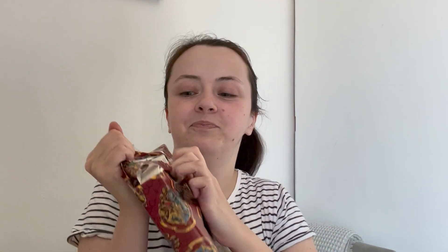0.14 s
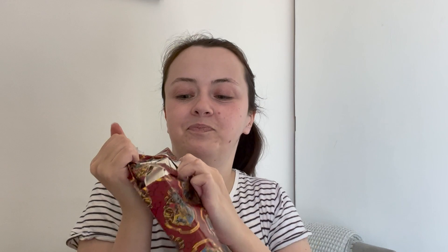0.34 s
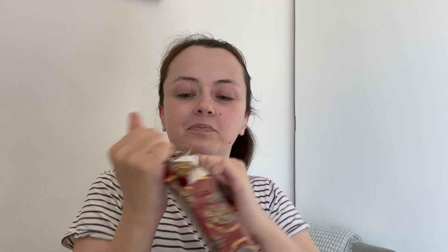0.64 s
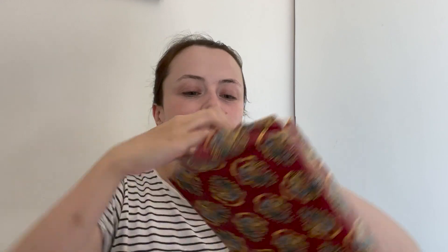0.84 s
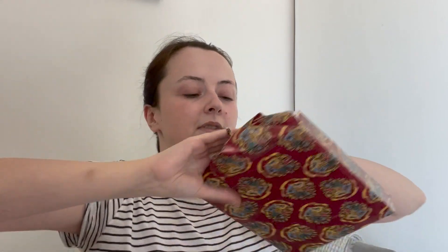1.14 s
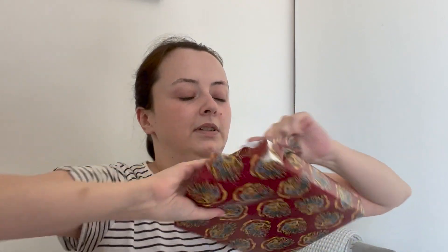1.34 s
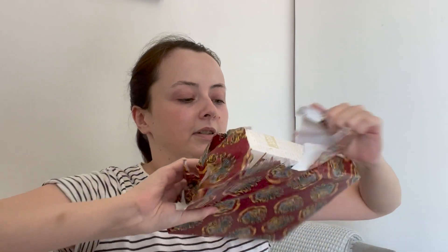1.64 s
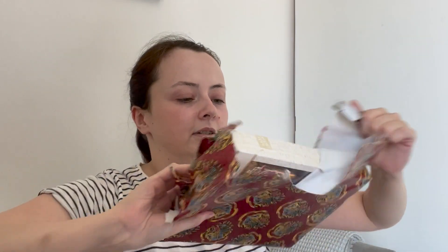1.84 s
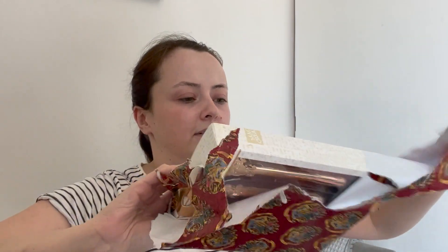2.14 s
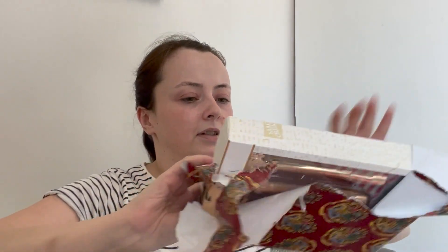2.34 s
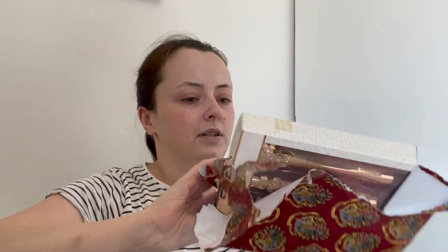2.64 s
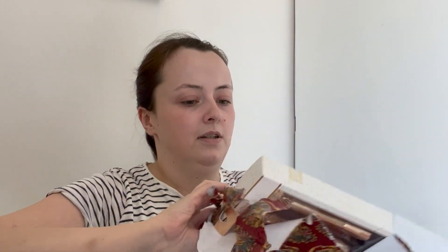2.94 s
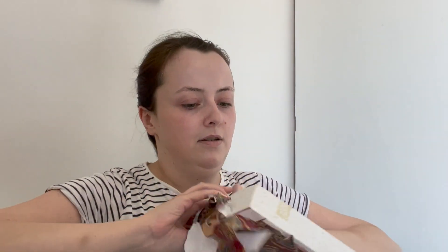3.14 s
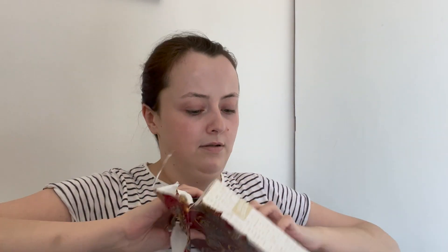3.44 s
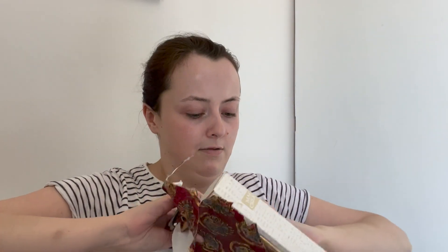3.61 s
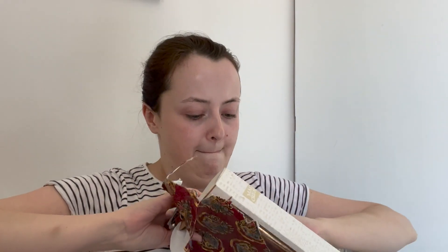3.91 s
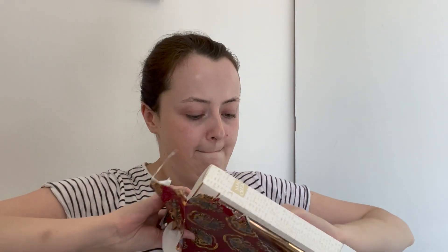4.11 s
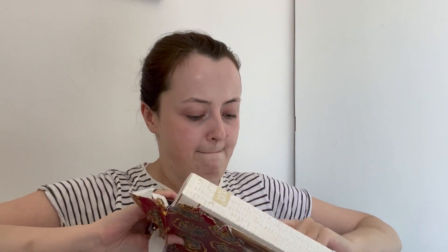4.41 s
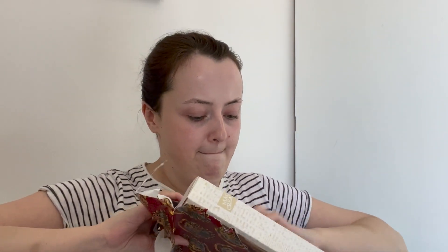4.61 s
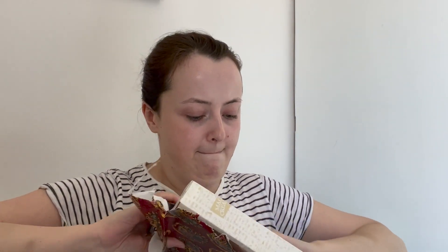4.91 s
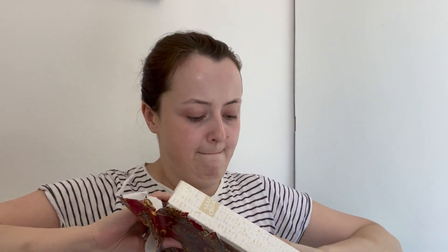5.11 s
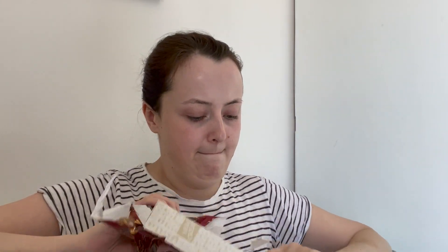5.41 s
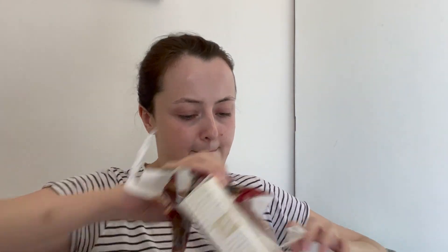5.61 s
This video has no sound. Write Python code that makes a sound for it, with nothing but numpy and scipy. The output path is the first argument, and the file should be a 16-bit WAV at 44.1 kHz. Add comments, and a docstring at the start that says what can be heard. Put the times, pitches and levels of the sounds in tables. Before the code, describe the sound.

Close stereo sound of a gift being unwrapped in a small, fairly bare room. Fingers crinkle stiff paper with sharp snaps and light knocks, then three short bright rips tear it open. After a quieter pause, a hollow cardboard box rubs and bumps within the loose paper, with soft rustling and brief edge scrapes. Faint low rumble lies beneath.

```python
"""Wrapping paper crackles under the fingers, is ripped off a cardboard box in three pulls, and the box slides out.
Buckling creases and parting fibres are random clicks that ring in bands of noise and drive the sheet and box.
Single creases snap as noise bursts, knocks excite a falling thud and the modes of the hollow box, and
edges rasp through a narrow, gliding resonance. All sounds in a small, fairly bare room with faint rumble,
heard in stereo at arm's length."""
import sys
import numpy as np
from scipy import signal
from scipy.fft import rfft, irfft, next_fast_len
from scipy.io import wavfile

SR = 44100
rng = np.random.default_rng(int(sys.argv[2]) if len(sys.argv) > 2 else 0)


def output_pcm(signal):
    """Save a mono or channel-first signal as 16-bit PCM at the path in sys.argv[1].

    Samples are clipped to [-1, 1] before scaling.
    """
    pcm = np.clip(np.atleast_2d(signal).T, -1, 1) * 32767
    wavfile.write(sys.argv[1], SR, np.round(pcm).astype(np.int16))


N = 253731
T = np.arange(N) / SR
FACET_RING_S = 0.0006  # energy decay of a small facet of paper

# Radiation of small stiff facets of paper. Each row: frequency in Hz, gain in dB.
CRACKLE_SPECTRUM = [(500, -7), (1400, -22.5), (1800, -6.5), (2400, -4.5), (4500, 0.5), (7000, 2), (9500, 2),
                    (11300, -3.5), (13700, 8), (15700, -14)]


def undb(db):
    """Decibels to amplitude ratio: 20 dB is a factor of ten."""
    return 10 ** (np.asarray(db) / 20)


def unit(x):
    """Normalization of power: scale to rms 1."""
    return x / np.sqrt(np.mean(x ** 2))


def ring(x, response):
    """Linear superposition: convolve a sound with an impulse response."""
    return signal.fftconvolve(x, response)[:N]


def colour(x, points, size=4096):
    """Minimum-phase filtering: folding the cepstrum makes a causal response with the given spectrum."""
    hz, db = np.transpose(points)
    bins_hz = np.fft.rfftfreq(size, 1 / SR)
    gain = undb(np.interp(np.log(bins_hz + 1), np.log(hz), db))
    cepstrum = irfft(np.log(gain))
    cepstrum[1:size // 2] *= 2
    cepstrum[size // 2 + 1:] = 0
    return ring(x, irfft(np.exp(rfft(cepstrum))))


def add(track, s, sound):
    """Superposition: mix a short sound into the track at time s."""
    start = max(int(s * SR), 0)
    track[start:start + len(sound)] += sound[:N - start]


def burst(decay_s, size=2048):
    """High modal density: one patch of paper rings as exponentially decaying noise."""
    return rng.standard_normal(size) * np.exp(-T[:size] / max(decay_s, 1 / SR))


def walk(per_s):
    """Slow random modulation: straight lines between random knots, with a spread near 1."""
    knots = rng.standard_normal(N // 100)
    return 1.2 * np.interp(T * per_s, np.arange(len(knots)), knots)


def grains(clicks, friction_db, decay_s, bend_db=0.5):
    """Impulsive excitation: clicks ring briefly, each with its own tint, as bending shifts the radiating bands."""
    # Edges of neighbouring bands in Hz.
    band_edges_hz = [60, 300, 700, 1300, 2200, 3600, 5600, 8500, 12000, 17000]
    out, at = np.zeros(N), np.flatnonzero(clicks)
    for band in zip(band_edges_hz, band_edges_hz[1:]):
        tint_db = rng.standard_normal(N)[at].clip(-2, 2)
        energy = np.zeros(N)
        energy[at] = (clicks[at] * undb(tint_db)) ** 2
        energy = signal.lfilter([1], [1, -np.exp(-1 / (decay_s * SR))], energy)
        # friction adds a steady hiss under the clicks
        envelope = np.sqrt(energy / energy.mean() + undb(friction_db) ** 2)
        band_filter = signal.butter(2, band, "bandpass", fs=SR, output="sos")
        noise = signal.sosfilt(band_filter, rng.standard_normal(N))
        out += noise * envelope * undb(bend_db * walk(per_s=45))
    return out


def stroke(start, rise_s, hold_s, release_s, db, sheet_db, box_db, sag_db_per_s=0):
    """Force envelope: a movement gathers, holds and dies away; gives gains of crackle, sheet and box."""
    age = T - start
    held = np.clip(age - rise_s, 0, max(hold_s, 0))
    released = np.maximum(age - rise_s - hold_s, 0)
    effort = np.clip(age / rise_s, 0, 1) * undb(-sag_db_per_s * held) * np.exp(-released / release_s)
    return np.outer(undb([db, db + sheet_db, db + box_db]), effort)


def paper(strokes, per_s, scatter_db, bunch_db, friction_db, tilt_db, flex_hiss_db=-9, bend_db=1.24):
    """Crackling noise: bunches of unequal fractures, over the hiss of sliding surfaces, drive paper and box."""
    # Radiation of the wide flexing sheet. Each row: frequency in Hz, gain in dB.
    sheet_spectrum = [(150, -21), (380, 0.5), (570, 3.5), (690, -6.5), (900, 0.5), (1150, 0.5), (1550, -3),
                      (1800, -6), (2300, -1.5), (4500, -40.5)]
    # Radiation of the rubbed box. Each row: frequency in Hz, gain in dB.
    rub_spectrum = [(40, -14), (70, -11), (135, -2.5), (250, 1), (350, -9.5), (408, 5), (470, -2),
                    (750, -23.5), (2000, -43.5)]
    # strokes that overlap add in power
    crackle_gain, sheet_gain, box_gain = np.sqrt(sum(gains ** 2 for gains in strokes))
    sizes = undb(scatter_db * np.minimum(rng.exponential(size=N), 3.5))
    chance = per_s / SR * undb(bunch_db * walk(per_s=60))
    clicks = (rng.random(N) < chance) * sizes
    # tilt is in dB per octave: a taut sheet sounds brighter than a slack one
    spectrum = [(hz, db + tilt_db * np.log2(hz)) for hz, db in CRACKLE_SPECTRUM]
    # small facets give the crisp top, the wider sheet rings longer
    crackle = unit(colour(grains(clicks, friction_db, FACET_RING_S, bend_db), spectrum))
    sheet = unit(colour(grains(clicks, flex_hiss_db, 0.0014, bend_db), sheet_spectrum))
    box = unit(colour(grains(clicks, friction_db, decay_s=0.00034), rub_spectrum))
    return crackle_gain * crackle + sheet_gain * sheet + box_gain * box


def air():
    """Coherent low-frequency noise: faint rumble of the building, much alike at left and right."""
    # Rumble. Each row: frequency in Hz, relative level in dB.
    rumble_spectrum = [(30, -29), (40, -10), (51, 3.5), (75, -20), (420, -16), (700, -27), (2000, -33.5),
                       (8000, -34), (16000, -46)]
    mid, side = (unit(colour(rng.standard_normal(N), rumble_spectrum, size=16384)) for _ in range(2))
    return undb(-57.5) * (mid + undb(-12) * np.array([side, -side]))


def standing_waves(x):
    """Modal resonance: a few low modes of the room hum on after the sound that excites them."""
    # Each row: frequency in Hz, level at resonance in dB over the direct sound, 60 dB decay time in seconds.
    low_modes = [(49.4, -7, 1), (253, -18, 0.2), (410, -4, 0.61)]
    hum = np.zeros(N)
    for hz, db, t60 in low_modes:
        q = np.pi * hz * t60 / np.log(1000)
        hum += undb(db) * signal.lfilter(*signal.iirpeak(hz, q, fs=SR), x)
    return hum


def room(x, early_db, size=24000, count=600):
    """Reflection and reverberation: direct sound, quick echoes off body and near wall, then tail and hum."""
    late_db, t60_s = -6.5, 0.33
    first_echo_s, early_decay_s, tail_delay_s = 0.0009, 0.0042, 0.006
    t = T[:size]
    # dividing by sqrt(size) makes the levels those of the whole response over the direct sound
    early = undb(early_db) * unit((t > first_echo_s) * np.exp(-t / early_decay_s)) / np.sqrt(size)
    late = undb(late_db) * unit((t > tail_delay_s) * undb(-60 * t / t60_s)) / np.sqrt(size)
    early = early[:size // 10]
    out = np.array([x + ring(x, late * rng.standard_normal(size)) for _ in range(2)])
    # the sound comes from ever new spots on the parcel, so the short paths keep changing
    for moment in np.array_split(np.arange(N), count):
        for channel in out:
            echoes = np.convolve(x[moment], early * rng.standard_normal(len(early)))
            add(channel, T[moment[0]], echoes)
    return out + standing_waves(x)


def scraping(rise_s=0.0019, release_s=0.012):
    """Stick-slip: a catching edge rasps at one pitch, which glides as its free length changes."""
    # Edges of paper and card scraping. Each row: start in seconds, hold in seconds, level in dB,
    # pitch of the edge at the start in Hz, pitch at the end in Hz.
    scrapes = [(3.017, 0.029, -45.5, 2900, 3800), (3.262, 0.081, -53.5, 1470, 1170),
               (3.571, 0.033, -47, 450, 420), (4.972, 0.018, -40, 2300, 2290),
               (5.15, 0.07, -52, 2280, 2420), (5.226, 0.089, -51.5, 487, 520)]
    out = np.zeros(N)
    slip_times = 1. * (rng.random(N) < 400 / SR)  # 400 slips per second on average
    slips = grains(slip_times, friction_db=0, decay_s=FACET_RING_S)
    for s, hold_s, db, start_hz, end_hz in scrapes:
        pitch = np.interp(T, [s, s + rise_s + hold_s], [start_hz, end_hz])
        turn = np.exp(2j * np.pi * np.cumsum(pitch) / SR)
        # a resonance that follows the pitch; its half width is a share of the starting pitch
        narrow = signal.butter(2, 0.06 * start_hz, fs=SR, output="sos")
        edge = unit((signal.sosfilt(narrow, slips / turn) * turn).real)
        out += edge * stroke(s, rise_s, hold_s, release_s, db, 0, 0)[0]
    return out


def sliding(release_s=0.057):
    """Sliding friction: card is pushed along inside its wrapping, with more hiss than ticks."""
    # Pushes of the box. Each row: start in seconds, rise in seconds, hold in seconds, rustle level in dB,
    # flexing sheet in dB over the rustle, rubbed box in dB over the rustle.
    slides = [(2.914, 0.0082, 0.011, -40, -4, -8), (3.01, 0.027, 0.014, -40.5, -2.5, -25),
              (3.083, 0.0053, 0.038, -38.5, -2.5, -14), (3.115, 0.064, 0.074, -39.5, -5, -8),
              (3.478, 0.047, 0.015, -41.5, -4.5, -4), (3.626, 0.031, 0.029, -43.5, -2.5, 3.5),
              (3.689, 0.016, 0.064, -43.5, -1.5, -8), (3.818, 0.0082, 0.015, -43, 1, 2.5),
              (3.9, 0.017, 0.2, -46, -3, -2), (4.11, 0.17, 0.028, -45.5, -9, -6.5),
              (4.582, 0.0084, 0.11, -55, -4.5, 1), (4.668, 0.062, 0.008, -37, -10, -6.5),
              (4.809, 0.028, 0.057, -39.5, -6, -10), (4.963, 0.0034, 0.025, -32.5, -3, -11.5),
              (5.03, 0.014, .23, -42.5, -7, -16), (5.27, 0.049, 0.052, -38.5, -6, -14.5),
              (5.516, 0.0024, 0.26, -51.5, -1.5, -6.5)]
    pushes = (stroke(s, rise_s, hold_s, release_s, db, sheet_db, box_db)
              for s, rise_s, hold_s, db, sheet_db, box_db in slides)
    return paper(pushes, per_s=660, scatter_db=5.5, bunch_db=6.0, friction_db=-0.5, tilt_db=-1.5,
                 flex_hiss_db=-2)


def knocks(scuff_db=-29, slap_db=-8, size=8192):
    """Dispersion and modal ringing: bending waves in card carry treble first, so each thud falls in pitch."""
    # Fingers and paper knocking the box. Each row: start in seconds, level of the thud in dB,
    # pitch at contact in Hz, pitch of the struck panel in Hz, decay in seconds.
    blows = [(0.104, -28, 610, 280, 0.016), (0.156, -32, 800, 382, 0.0066),
             (0.336, -28.5, 840, 354, 0.0091), (0.63, -35.5, 700, 298, 0.022),
             (0.805, -36, 915, 348, 0.0069), (2.04, -33.5, 1170, 497, 0.0044),
             (2.412, -38, 815, 209.5, 0.035), (2.739, -32.5, 763, 268, 0.016),
             (3.05, -33, 586, 473, 0.0059), (3.0809, -22.5, 832, 480, 0.0095),
             (3.094, -33, 560, 507, 0.006), (3.2543, -22.5, 1480, 1080, 0.0022),
             (3.349, -31.5, 1220, 326, 0.0064), (3.418, -36.5, 605, 218, 0.013),
             (3.54, -35, 1170, 220, 0.0033), (3.645, -32, 450, 295, 0.015),
             (3.841, -26.5, 1160, 405, 0.0045), (3.8994, -22.5, 1318, 264, 0.014),
             (4.3, -35, 507, 411, 0.033), (4.317, -36, 586, 397, 0.017), (4.429, -44, 1096, 380, 0.01),
             (4.585, -36, 1050, 267, 0.0094), (4.603, -35.5, 920, 170, 0.019),
             (4.759, -41, 695, 230, 0.008), (4.966, -23, 1366, 520, 0.007),
             (5.655, -29.5, 1100, 267, 0.0077)]
    # Modes of the cardboard box. Each row: frequency in Hz, relative level in dB, 60 dB decay time in seconds.
    box_modes = [(136, 7, 0.19), (248, 2.5, 0.07), (311, 2.5, 0.14), (412, 2.5, 0.13), (570, 4, 0.04),
                 (948, 2.5, 0.051), (1073, 10.5, 0.066)]
    slap_low_hz, slap_high_hz = 850, 2200
    thud_fall_s, thud_waver_db, box_ring_db = 0.0036, 1.6, -4
    out, age = np.zeros(N), T[:size]
    hz, mode_db, t60 = np.transpose(box_modes)[:, :, None]
    slap_band = signal.butter(2, (slap_low_hz, slap_high_hz), "bandpass", fs=SR, output="sos")
    detunings = rng.standard_normal((len(blows), len(box_modes), 1))
    for (s, db, contact_hz, panel_hz, decay_s), detune in zip(blows, detunings):
        # the thud sinks from the pitch of the contact to that of the struck panel
        pitch = panel_hz + (contact_hz - panel_hz) * np.exp(-age / thud_fall_s)
        # waves coming back from the edges of the panel make it uneven
        pitch = pitch * undb(thud_waver_db * walk(per_s=400)[:size])
        thud = np.sin(2 * np.pi * np.cumsum(pitch) / SR) * np.exp(-age / decay_s)
        # a soft finger pad favours the low modes, a stiff paper edge the high ones
        ratio = hz / contact_hz
        weight = undb(mode_db) * ratio / (1 + ratio ** 2) ** 1.5
        # the hold on the box shifts its modes from blow to blow
        modes = np.sin(2 * np.pi * hz * (1 + 0.02 * detune) * age)
        ringing = np.sum(weight * undb(-60 * age / t60) * modes, axis=0)
        # after landing, the finger drags on over the card
        push = signal.unit_impulse(size) + undb(scuff_db) * burst(decay_s, size)
        body = signal.fftconvolve(ringing, push)[:size]
        body = undb(box_ring_db) * body / np.abs(body).max()
        # loose paper slaps at the point of contact, louder for a harder touch
        slap = signal.sosfilt(slap_band, burst(decay_s / 2, size))
        slap_gain = undb(slap_db) * contact_hz / slap_low_hz
        slap = slap_gain * slap / np.abs(slap).max()
        add(out, s, undb(db) * (thud + body + slap))
    return out


def crinkling(rise_s=0.0028, release_s=0.038):
    """Buckling: each grip of the fingers bends the paper in sparse, separate ticks."""
    # Fingers gathering the paper. Each row: start in seconds, hold in seconds, crackle level in dB,
    # flexing sheet in dB over the crackle, rubbed box in dB over the crackle.
    crinkles = [(-.02, 0.1, -33.5, -5.5, -9), (0.159, 0.039, -36, -6.5, -7.5),
                (0.241, 0.036, -34.5, -9.5, -12), (0.37, 0.046, -39.5, -6.5, -10),
                (0.423, 0.0066, -36, -18, -13), (0.472, 0.043, -34.5, -9, -8),
                (0.583, 0.078, -45.5, -1, -2), (0.684, 0.025, -36.5, -4.5, -11.5),
                (0.771, 0.078, -47.5, -5.5, -2), (0.903, 0.0057, -47.5, -5.5, -1),
                (1.027, 0.078, -51, -7.5, -6), (1.131, 0.27, -45.5, -1.5, -6),
                (1.42, 0.063, -43, -5.5, -10.5), (1.752, 0.055, -32, -8, -21), (2.02, 0.11, -43, -8, -37),
                (2.119, 0.05, -38.5, -4, -8.5), (2.255, 0.056, -55, -2, -10),
                (2.404, 0.0073, -55, 1.5, 10.5), (2.604, 0.17, -62, 1.5, 6.5),
                (2.732, 0.085, -52.5, -4.5, 4.5), (2.816, 0.14, -47.5, -9, -9.5)]
    grips = (stroke(s, rise_s, hold_s, release_s, db, sheet_db, box_db)
             for s, hold_s, db, sheet_db, box_db in crinkles)
    return paper(grips, per_s=380, scatter_db=1.0, bunch_db=3.0, friction_db=-8, tilt_db=-0.95, bend_db=1.9)


def snaps(crack_s=0.0009, flutter_s=0.007, flutter_db=-17):
    """Snap-through: a crease cracks sharply, the facet beside it pops duller, and the sheet flutters briefly."""
    # Creases giving way. Each row: start in seconds, crack level in dB, level of the facet's pop in dB,
    # both ahead of the spectra.
    creases = [(0.075, -25, -29), (0.1009, -16.5, -23), (0.1547, -26, -14), (0.236, -17.5, -33),
               (0.3355, -11, -26), (0.5346, -28, -10.5), (0.6949, -22, -17), (0.9081, -38, -15),
               (1.039, -33, -51), (1.137, -26, -28), (1.253, -16, -18), (1.3574, -33, -9),
               (1.4335, -33, -29), (1.484, -21.5, -25), (1.551, -25, -11), (1.6723, -18.5, -22),
               (1.7505, -20, -25), (1.827, -12, -20), (1.852, -20, -21), (2.0423, -25, -10),
               (2.128, -15.5, -33), (2.1335, -18, -31), (2.156, -13, -22), (2.162, -17.5, -22),
               (2.306, -27.5, -19), (2.6042, -46, -31.5), (3.0107, -22.5, -13.5), (3.081, -30, -17),
               (3.4725, -39.5, -28), (3.5409, -32, -14.5), (3.632, -31, -21), (3.8235, -21.5, -30),
               (3.8435, -23, -17), (3.8991, -19.5, -6.5), (4.4957, -36.5, -30.5), (4.586, -44, -40),
               (4.6903, -33, -27.5), (4.7318, -21.5, -31), (4.8612, -23.5, -35), (4.964, -26, -16),
               (5.39, -29, -16), (5.6333, -26, -32)]
    # Radiation of a flipping facet. Each row: frequency in Hz, gain in dB.
    pop_spectrum = [(300, -45), (800, -7.5), (1400, -4.5), (2300, -6.5), (4000, -19), (9000, -40)]
    cracks, pops = np.zeros((2, N))
    for s, crack_db, pop_db in creases:
        add(cracks, s, undb(crack_db) * (burst(crack_s) + undb(flutter_db) * burst(flutter_s)))
        add(pops, s, undb(pop_db) * burst(2 * crack_s))
    return colour(cracks, CRACKLE_SPECTRUM) + colour(pops, pop_spectrum)


def ripping(release_s=0.026, sag_db_per_s=24.5):
    """Fracture: fibres part densely; each stroke bites hardest at first and eases as the tear runs."""
    # Strokes that tear the sheet. Each row: start in seconds, rise in seconds, hold in seconds,
    # crackle level in dB, flexing sheet in dB over the crackle, rubbed box in dB over the crackle.
    rips = [(1.242, 0.022, 0.016, -18, -8.5, -10.5), (1.299, 0.013, 0.037, -25, -4.5, -10),
            (1.504, 0.031, 0.023, -27, -5.5, -11), (1.565, 0.0087, 0.072, -27.5, -5.5, -12.5),
            (1.765, 0.058, 0.12, -24.5, -8.5, -11), (1.899, 0.029, 0.08, -32, -3.5, -6.5)]
    pulls = (stroke(s, rise_s, hold_s, release_s, db, sheet_db, box_db, sag_db_per_s)
             for s, rise_s, hold_s, db, sheet_db, box_db in rips)
    return paper(pulls, per_s=2600, scatter_db=3.0, bunch_db=2.5, friction_db=-6, tilt_db=-0.95)


def scene():
    """Superposition of sources: paper sounds and knocks in one room, over its rumble."""
    wrapping = crinkling() + ripping() + sliding() + snaps() + scraping()
    # the broad face of the box sends its knocks more directly to the listener
    return room(wrapping, early_db=-5) + room(knocks(), early_db=-11) + air()


def record(dry):
    """Stereo image: phase, width and level between left and right differ with frequency; bass and top are cut."""
    # Left and right channel. Each row: frequency in Hz, phase by which left leads in radians,
    # gain of the side signal in dB, left minus right level in dB.
    stereo_image = [(97, 0.5, -15, 1.5), (173, 1, -12, 1), (321, 1, 1, -0.5), (440, 1.62, -7, -4),
                    (722, 0.5, 12, -0.5), (1020, 1, -0.5, -4.5), (1940, -1, 5, 0), (3090, -1.5, 11, 0.5),
                    (5050, -2, 4.5, -2.5), (7800, -2, 2.5, -1.5), (8760, 0, -5, -0.5), (11360, 0, -19, 1),
                    (12270, 2.5, 10, -1.5), (12970, 3.5, -24, 1), (16800, 1.5, -40, -2.5)]
    size = next_fast_len(N + 4096)
    hz, *columns = np.transpose(stereo_image)
    bins_hz = np.fft.rfftfreq(size, 1 / SR)
    phase, side_db, pan_db = (np.interp(bins_hz, hz, column) for column in columns)
    left, right = rfft(dry, size)
    mid, side = (left + right) / 2, undb(side_db) * (left - right) / 2
    # each channel takes half of the phase and level difference
    turn = undb(pan_db / 2) * np.exp(0.5j * phase)
    heard = irfft(np.array([(mid + side) * turn, (mid - side) / turn]), size)[:, :N]
    bass_cut = signal.butter(4, 41, "highpass", fs=SR, output="sos")
    top_cut = signal.ellip(8, 0.2, 70, 15900, fs=SR, output="sos")
    return signal.sosfilt(top_cut, signal.sosfilt(bass_cut, heard))


dry = scene()
out = record(dry)
output_pcm(out)
```